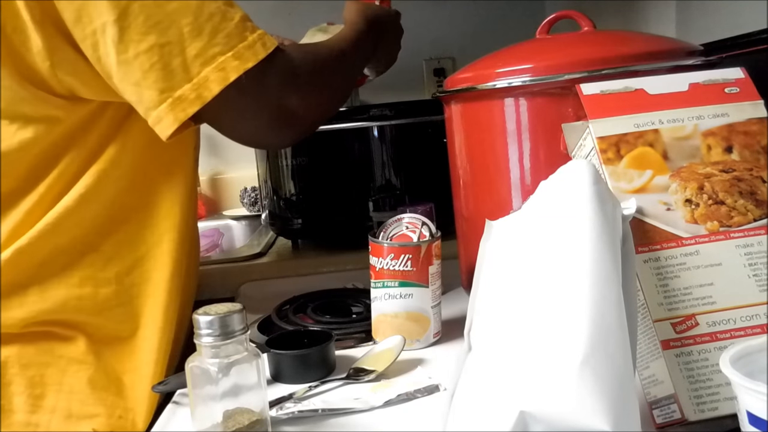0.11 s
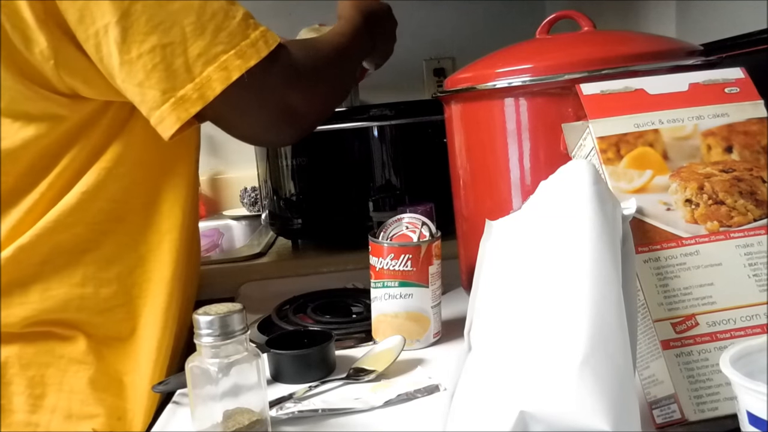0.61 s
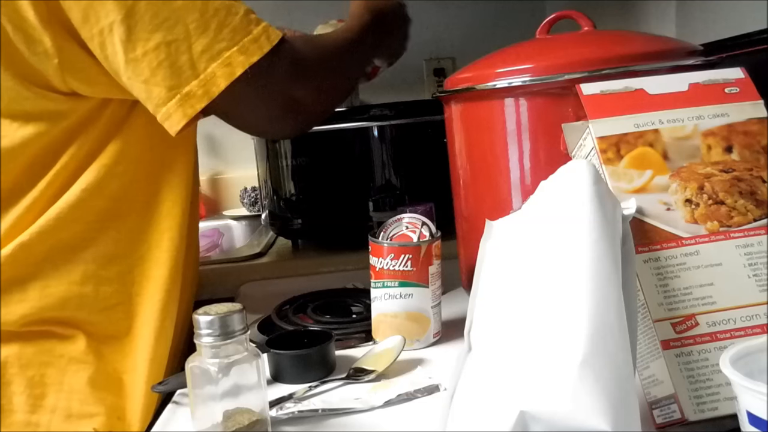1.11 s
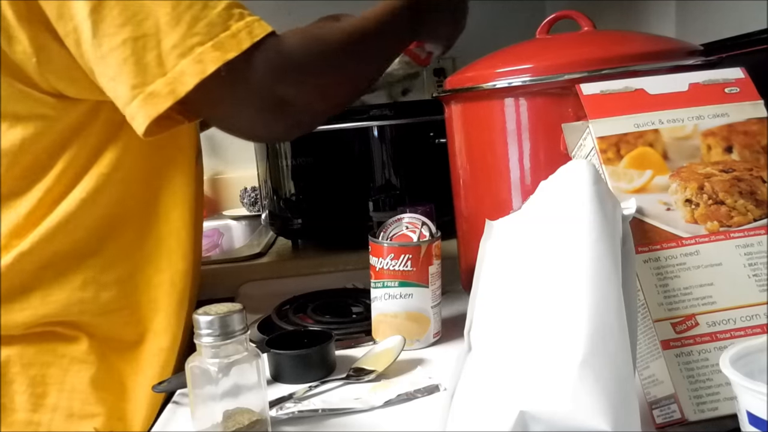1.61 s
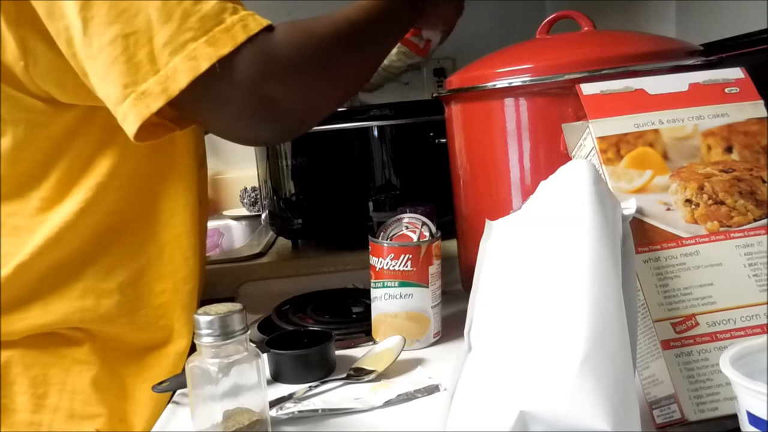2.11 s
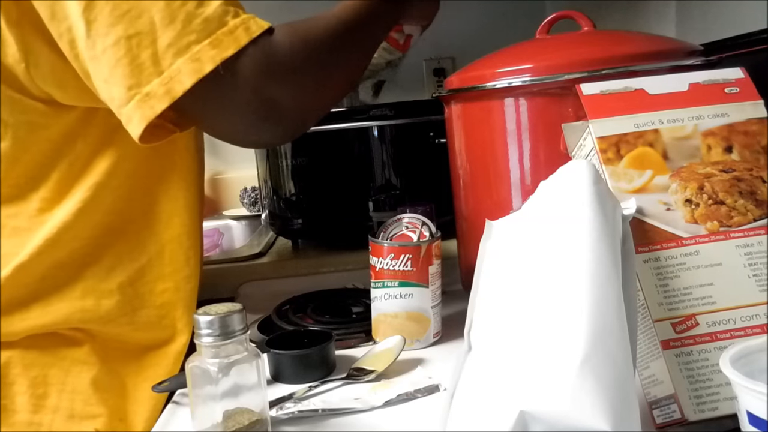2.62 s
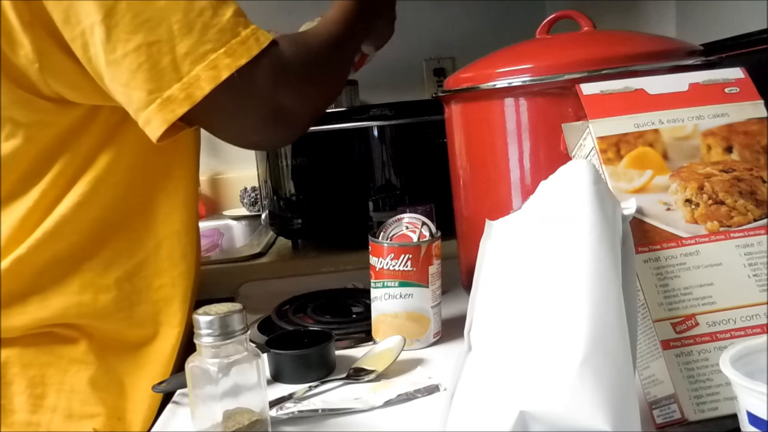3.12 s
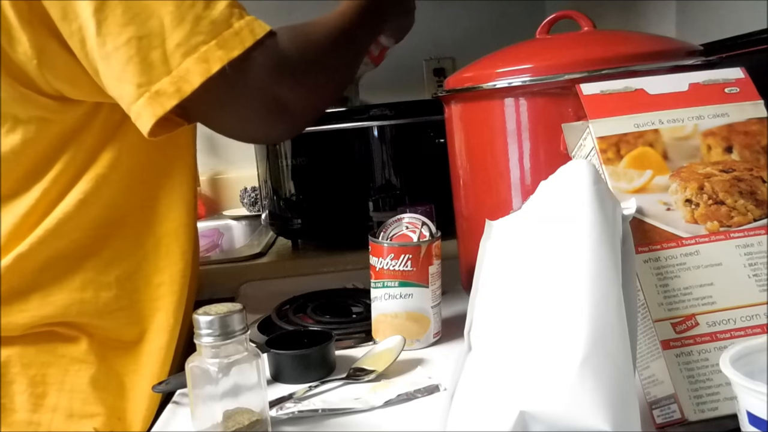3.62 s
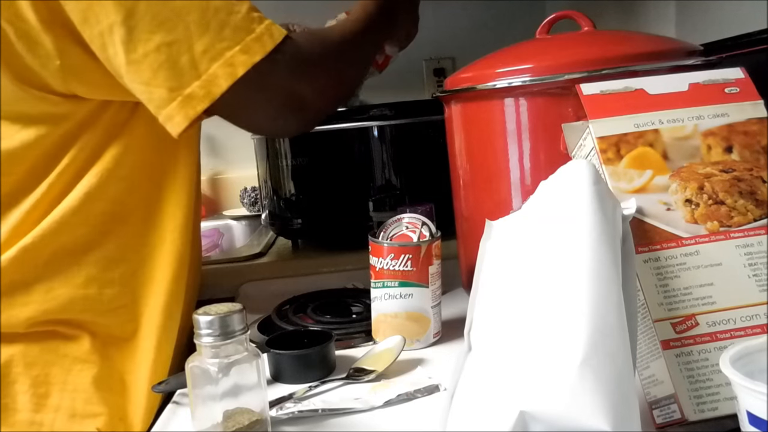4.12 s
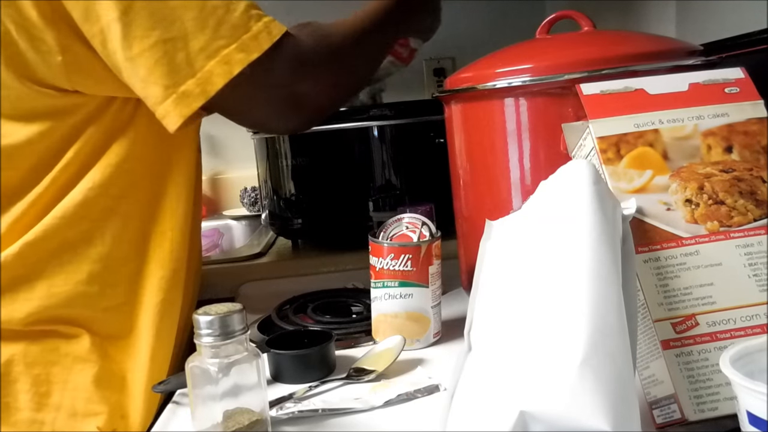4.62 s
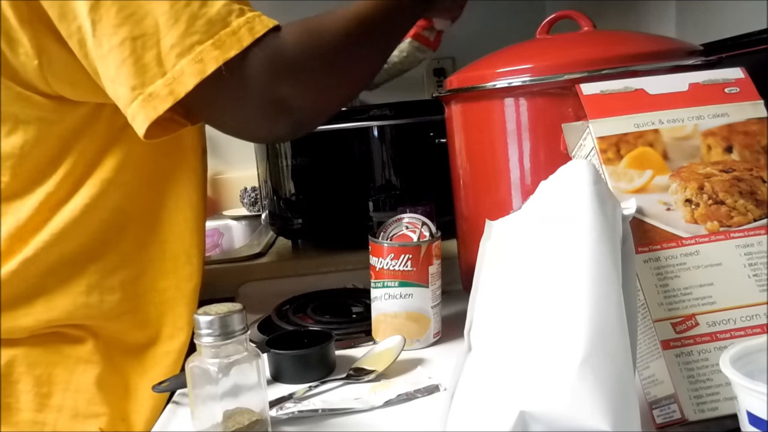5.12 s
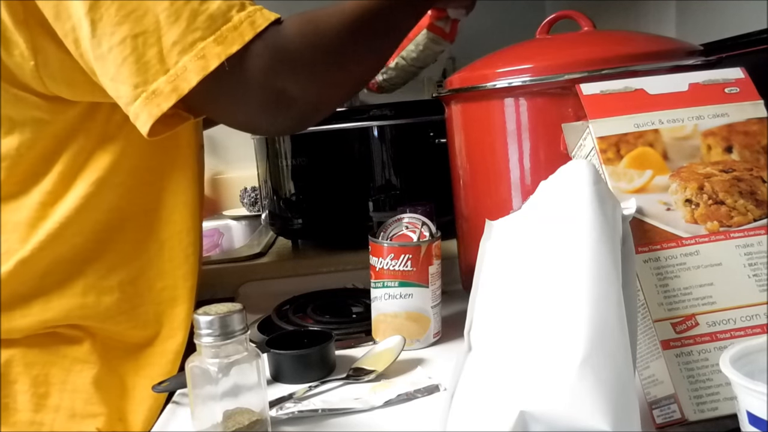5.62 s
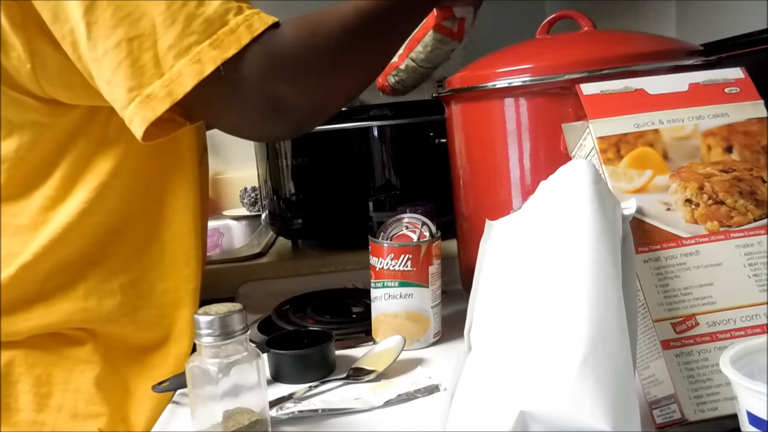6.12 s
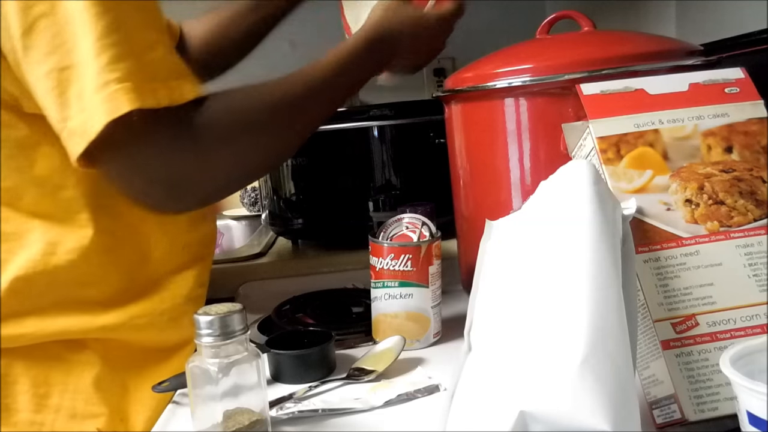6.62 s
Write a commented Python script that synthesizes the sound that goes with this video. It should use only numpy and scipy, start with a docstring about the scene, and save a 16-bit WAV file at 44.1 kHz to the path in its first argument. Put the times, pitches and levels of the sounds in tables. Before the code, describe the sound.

Frozen vegetables are shaken out of a crinkly bag into a hollow pot. Crisp, bright, irregular snaps dominate, with softer bean rattle and knocks underneath and occasional hard ceramic ticks. After an initial snap and brief lull it gets dense for several seconds, then sparse, almost silent, then a last few snaps. Steady quiet motor hum, short hard kitchen echo, close wide stereo pickup.

```python
"""Frozen beans are shaken from a stiff plastic bag into a stoneware pot, an arm's length from a small stereo camera.
An appliance hums throughout. A first snap leads to a short lull, then the shaking builds to a thick crackle:
noise bursts and clicks for the creases, struck resonances for beans in the hollow pot, decaying sines for its rim.
The crackle thins out after some five seconds, all but stops, and a last cluster of snaps ends the scene.
A small hard kitchen, made of decaying noise, echoes it all briefly."""
import sys
import numpy as np
from scipy import signal
from scipy.fft import rfft, irfft
from scipy.io import wavfile
from scipy.ndimage import uniform_filter1d

SR = 44100
rng = np.random.default_rng(int(sys.argv[2]) if len(sys.argv) > 2 else 0)


def log_audio(samples):
    """Write samples as a 16-bit WAV file to the path given in sys.argv[1]."""
    # one column per channel
    frames = np.atleast_2d(samples).T
    # limit to full scale, then quantise
    limited = np.clip(frames, -1, 1)
    pcm = np.round(limited * 32767).astype(np.int16)
    wavfile.write(sys.argv[1], SR, pcm)


def gain_from_decibels(decibels):
    """Convert decibel values to linear amplitude factors."""
    exponent = np.asarray(decibels, float) / 20
    return 10 ** exponent


N = 297675

# Dense rustle under the single events; the lesser snaps and knocks follow its levels too.
# Each row: time in seconds, level of the bag film in dB, level of the tumbling beans in dB.
RUSTLE_LEVELS = [(0.0, -33.5, -35), (0.25, -46.5, -51), (0.55, -39, -41.5), (0.72, -33.5, -41),
                 (0.76, -33, -33.5), (0.89, -23.5, -33), (1.08, -38.5, -38), (1.41, -26.5, -35.5),
                 (1.65, -27.5, -36), (1.87, -39, -40), (1.96, -31, -38), (2.03, -37, -38.5),
                 (2.2, -28, -36), (2.89, -29, -37.5), (3.12, -37.5, -40), (3.36, -29.5, -34.5),
                 (3.6, -31.5, -39.5), (3.97, -40.5, -40.5), (4.1, -36.5, -40), (4.45, -27.5, -41),
                 (4.7, -41.5, -45), (5.02, -47, -44.5), (6.0, -43, -42), (6.24, -54, -59),
                 (6.58, -53.5, -45), (6.75, -36, -33.5)]


def snaps():
    """Creases crumple in the film; each has its own length, colour and balance of crisp and middle."""
    # The loud creases. Each row: start in seconds, relative level of the crisp part in dB,
    # middle part re crisp in dB, decay time constant of the crisp part in ms, brightest pitch in Hz.
    loud_creases = [(0.0851, -6, -9.5, 6.6, 8900), (0.154, -14.5, -31, 7.7, 10100),
                    (0.6723, -13, -35, 4.3, 11300), (0.726, -17.5, -15, 17, 6300),
                    (0.7648, -16, -3.5, 16, 5700), (0.8023, -7.5, -27, 9.1, 4700),
                    (0.84, -13.5, -7.5, 12, 4670), (0.859, -9.5, -9, 7.9, 4820),
                    (0.894, -12.5, -15, 6, 7500), (0.9136, -11.5, -6, 21, 5330),
                    (0.9849, -7, -12.5, 8.3, 4650), (1.0115, -16.5, 0, 8.3, 7540),
                    (1.134, -21, -11, 8.2, 5580), (1.2015, -20, -4.5, 13, 5300),
                    (1.251, -14.5, -5, 15, 8410), (1.307, -12, -8, 6, 8520), (1.3235, -8, -7.5, 15, 10500),
                    (1.4083, -11, -5, 6.4, 9650), (1.422, -3.5, -13, 3.8, 11500),
                    (1.484, -19, -2, 13, 4960), (1.564, -9.5, -10, 24, 6200), (1.673, -11, -11, 4.1, 6800),
                    (1.7337, -6.5, -12.5, 6.8, 5300), (1.7962, -14.5, -6, 11, 10200),
                    (1.8202, -15.5, -12, 19, 8950), (1.8923, -10, -9.5, 8.2, 10100),
                    (2.0382, -6, -13, 7.5, 5940), (2.0847, -14, -7.5, 10, 4610), (2.16, -8, -8, 3.3, 8500),
                    (2.1861, -14.5, -0.5, 8.3, 6200), (2.2502, -13.5, -4.5, 6.9, 4670),
                    (2.2634, -8.5, -8.5, 9.8, 9300), (2.3243, -12, -3, 8.8, 10200),
                    (2.35, -13.5, -4, 13, 8960), (2.4092, -11, -8.5, 17, 8890),
                    (2.4432, -10.5, -9, 12, 10500), (2.5636, -9.5, -11, 9.7, 5450),
                    (2.5876, -11.5, -16, 17, 8110), (2.6148, -10.5, -4, 6.1, 10000),
                    (2.6466, -12, -10, 15, 10100), (2.6816, -10, -8.5, 24, 10000),
                    (2.757, -14, -5, 22, 5000), (2.8542, -5.5, -7, 4.4, 9970), (2.8817, -15, -8, 7, 7000),
                    (2.9868, -16.5, -13, 16, 8500), (3.0077, -4.5, -10.5, 9.7, 9400),
                    (3.033, -11.5, -6.5, 13.4, 7900), (3.0792, -10, -9.5, 20, 7670),
                    (3.1457, -14, -11, 7.2, 4870), (3.197, -11, -12.5, 8.1, 5570),
                    (3.2215, -16, -15, 8.6, 9190), (3.2806, -14, -7.5, 23, 6850),
                    (3.3504, -10.5, -5, 7.7, 8830), (3.3645, -8.5, -5, 3.8, 9490),
                    (3.4169, -17, -5.5, 38, 8300), (3.5197, -13.5, -2.5, 5.5, 8790),
                    (3.5788, -13, -19, 8.8, 7200), (3.6146, -11.5, -27, 5.8, 9200),
                    (3.678, -18, -9.5, 21, 10300), (3.766, -11, -13, 7.4, 6940),
                    (3.8319, -21, 2, 9.4, 4840), (3.8845, -14.5, -16, 11, 10200),
                    (3.915, -15.5, -2.5, 4.8, 5920), (3.991, -18, -10, 6.9, 9170),
                    (4.0132, -16, -3.5, 5.2, 8330), (4.0355, 0.5, -16, 6, 4600),
                    (4.114, -18.5, -5, 8.2, 10400), (4.2295, -18.5, -7.5, 5.4, 4600),
                    (4.3942, -15.5, -18, 20, 5580), (4.5164, -2, -31, 5, 10000),
                    (4.5479, -11.5, -11, 17, 4810), (4.583, -7.5, -16, 8.2, 4830),
                    (4.638, -12.5, -29, 7.5, 6310), (4.675, -14.5, -31, 12.6, 7700),
                    (4.7947, -26.5, -10, 8.6, 7700), (4.8687, -21.5, -1.5, 12, 6940),
                    (4.9461, -11.5, -1, 4.9, 9800), (5.0669, -18.5, -5.5, 4.5, 4820),
                    (5.1922, -28, -2, 5.7, 7350), (5.2985, -9.5, -7.5, 6.5, 9700),
                    (5.3644, -22.5, 0.5, 10, 8910), (5.441, -17.5, -6, 5, 7360), (5.506, -19, -9, 13, 6900),
                    (5.5483, -13, -16, 8.1, 11100), (5.5983, -17, -4, 9.5, 8660),
                    (5.662, -20, -6, 13, 4520), (5.7624, -25, -13, 10, 5540),
                    (5.8193, -18.5, -11, 11, 5760), (5.8395, -12.5, -15.5, 11.5, 11100),
                    (5.902, -25, -2, 10.5, 8200), (5.985, -12.5, -10, 6.9, 6240),
                    (6.0012, -12.5, -11, 7.6, 8500), (6.13, -23, -11, 9.1, 8850),
                    (6.566, -28.5, -1, 17, 12300), (6.6343, -13, -13, 4.8, 11000),
                    (6.6747, -28, 0.5, 7.1, 8320), (6.6928, -10.5, -6.5, 14, 9000)]
    small_middle_db, small_ms = -6.5, 9.2
    low_hz, high_hz = 4600, 10500
    # lesser creases come at random, as strong as the rustle of the film is
    s, db, size = at_random(count=30, column=1, re_db=12)
    small_hz = low_hz * (high_hz / low_hz) ** size
    small = [s, db, np.full(len(s), small_middle_db), np.full(len(s), small_ms), small_hz]
    s, db, middle_db, ms, hz = np.hstack([np.transpose(loud_creases), small])
    crisp = bursts(s + 0.0006, db, ms / 1000, rise_s=0.00038, grain_db=2.5, pitch_hz=hz)
    middle = bursts(s + 0.0008, db + middle_db, 1.66 * ms / 1000, rise_s=0.002, grain_db=2.5)
    return gain_from_decibels(-12) * band(crisp, 4600, 12300) + gain_from_decibels(-4.5) * band(middle, 1440, 5120)


def cracks():
    """The sharp wide click that opens some snaps, with two weaker bounces off the counter just after."""
    # Each row: start in seconds, relative level in dB.
    sharp_starts = [(0.7451, -8), (1.307, -5.5), (1.425, -7), (1.735, -7), (2.086, -11), (2.6831, -4),
                    (2.8552, -5), (3.01, -8), (3.1981, -15), (4.0365, -0.5), (4.871, -18), (4.948, -21),
                    (5.441, -18), (5.5058, -14), (5.585, -7), (5.8212, -13), (6.001, -20), (6.5685, -15),
                    (6.637, -6.5), (6.677, -13), (6.695, -2)]
    s, db = np.transpose(sharp_starts)
    sign = rng.choice([-1, 1], (len(s), 2))
    middle_and_side = np.array([[1.1], [0.8]])
    out = np.zeros((2, N))
    for delay_s, click_db in [(0, 4.5), (0.0006, -4.5), (0.0017, 1)]:
        at = ((s + delay_s) * SR).astype(int)
        out[:, at] += gain_from_decibels(db + click_db) * sign.T * middle_and_side
    return band(out, 1300, 13400)


def rustle():
    """Countless small creases in the film, and beans tumbling over each other and into the pot."""
    # Colour of the bag's crackle. Each row: frequency in Hz, relative density in dB per Hz.
    film_colour = [(1470, -16.5), (2500, 1), (3370, 0), (10300, 2), (15100, -8.5), (16100, -24),
                   (16500, -15)]
    # Colour of bean on bean. Each row: frequency in Hz, relative density in dB per Hz.
    bean_colour = [(500, -27), (850, -11.5), (979, 4), (1440, -6), (2020, -10), (3380, -8.5), (5000, -9),
                   (6500, -19), (11000, -120)]
    s, film_db, beans_db = np.transpose(RUSTLE_LEVELS)
    t = np.arange(N) / SR
    film = unit(colour(grains(per_s=660, scatter_db=2.5, smear_s=0.01), film_colour))
    tumble = grains(per_s=250, scatter_db=2.0, smear_s=0.02)
    beans = unit(colour(tumble, bean_colour)) + gain_from_decibels(-5) * unit(hollow(tumble))
    # the heap shifting as a whole is a duller, smoother murmur
    heap = gain_from_decibels(-8.5) * unit(band(grains(per_s=1300, scatter_db=3.5, smear_s=0.01), 273, 770))
    film_level = gain_from_decibels(np.interp(t, s, film_db))
    beans_level = gain_from_decibels(np.interp(t, s, beans_db))
    return film * film_level + (beans + heap) * beans_level


def knocks():
    """Beans land and ring the hollow of the pot."""
    # The loud landings. Each row: start in seconds, relative level in dB.
    landings = [(0.074, -23), (0.592, -29.5), (0.635, -29), (0.74, -31), (0.852, -25.5), (0.91, -23.5),
                (0.932, -29), (0.981, -28.5), (1.199, -25), (1.522, -27), (1.564, -27), (1.734, -25),
                (1.797, -25), (1.893, -27.5), (1.975, -26), (2.043, -22.5), (2.195, -24), (2.253, -24.5),
                (2.346, -24.5), (2.427, -27.5), (2.611, -23), (2.696, -22.5), (2.746, -32), (3.025, -26),
                (3.281, -28), (3.703, -30.5), (3.848, -24.5), (4.038, -26), (4.869, -23.5), (4.923, -25.5),
                (5.284, -30), (5.3, -19.5), (5.356, -30), (5.37, -26), (5.507, -29), (5.587, -29),
                (5.599, -24), (5.661, -27), (5.674, -29), (5.764, -25), (5.903, -21.5), (5.967, -30.5),
                (6.59, -28), (6.673, -33)]
    # lesser beans land at random, as strong as the tumbling is
    small = at_random(count=30, column=2, re_db=7)[:2]
    s, db = np.hstack([np.transpose(landings), small])
    return gain_from_decibels(28.5) * hollow(strikes(s, db, chatter_db=-19, chatter_s=0.0064))


def hollow(x):
    """The air in the pot rings at a few broad resonances and hardly at all below the lowest."""
    # Each row: resonance in Hz, width in Hz, relative level in dB.
    air_modes = [(1015, 83, 0), (1086, 180, 4), (1262, 65, -3.5), (1570, 230, -10.5)]
    rings = 0
    for hz, width, db in air_modes:
        rings = rings + gain_from_decibels(db) * signal.lfilter(*signal.iirpeak(hz, hz / width, SR), x)
    return signal.sosfilt(signal.butter(5, 860, "high", fs=SR, output="sos"), rings)


def clinks():
    """Beans strike the stoneware rim and ring its modes as dying sines; each blow favours other modes."""
    # Beans chattering on the rim. Each row: start in seconds, relative level in dB,
    # middle modes re lowest in dB, top modes re lowest in dB.
    rim_blows = [(0.2508, -41.5, -5, -9), (3.8138, -35, -1, -20), (3.8314, -35, -2, -15),
                 (3.845, -47.5, 0, -20), (3.87, -46, -3, -20), (4.547, -32, -5, -2),
                 (4.574, -33.5, 0, -0.5), (4.5864, -38, 3, 2), (4.6144, -44, 0, -2), (4.8727, -44, 0, -10),
                 (4.9483, -38, -4, -18), (6.032, -40.5, -5, -10)]
    # Modes of the rim. Each row: frequency in Hz, relative level in dB, time to fall by 60 dB in seconds.
    rim_modes = [(2584, 13, 0.045), (3290, 13, 0.019), (3720, 11, 0.038), (4820, 16, 0.055),
                 (5770, 2, .025), (8430, 8.5, 0.03)]
    s, db, middle_db, top_db = np.transpose(rim_blows)
    t, out = np.arange(6000) / SR, 0
    for hz, mode_db, t60 in rim_modes:
        if hz < 3000:
            spot_db = 0
        elif hz < 4200:
            spot_db = middle_db
        else:
            spot_db = top_db
        ring = gain_from_decibels(mode_db - 60 * t / t60) * np.sin(2 * np.pi * hz * t)
        blows = strikes(s, db + spot_db, chatter_db=-14.5, chatter_s=0.012)
        out = out + signal.oaconvolve(blows, ring[None], axes=1)[:, :N]
    return gain_from_decibels(-5) * out


def strikes(times, db, chatter_db, chatter_s):
    """A clean contact within a chatter of the bean that swells and dies in a few ms."""
    out = bursts(times, db + chatter_db, np.full(len(times), chatter_s), rise_s=0.0013, grain_db=2.5)
    contact = ((times + 0.001) * SR).astype(int)
    out[:, contact] += gain_from_decibels(db) * rng.choice([-1, 1], (len(times), 2)).T
    return out


def bursts(times, db, length_s, rise_s, grain_db, pitch_hz=None):
    """Each blow: a quick run of uneven ticks that dies with the reflections from counter, pots and wall."""
    t = np.arange(4000) / SR
    out = np.zeros((2, N + len(t)))
    for k, (s, gain, fall) in enumerate(zip(times, gain_from_decibels(db), np.maximum(length_s, 0.001))):
        ticks = gain_from_decibels(grain_db * np.repeat(rng.standard_normal(100), 40))
        shape = (1 - np.exp(-t / rise_s)) * np.exp(-t / fall)
        blow = gain * shape * ticks * pair(len(t))
        if pitch_hz is not None:  # the size of the buckling patch sets its colour
            peak = signal.lfilter(*signal.iirpeak(pitch_hz[k], 2.5, SR), blow)
            blow = 1.09 * blow + 1.03 * peak
        start = int(s * SR)
        out[:, start:start + len(t)] += blow
    return out[:, :N]


def grains(per_s, scatter_db, smear_s):
    """Random ticks of very unequal size, in clusters, each smeared by close reflections."""
    k = 300  # samples over which the density holds
    cluster = np.repeat(rng.exponential(size=N // k + 1), k)[:N]
    chosen = rng.random(N) < cluster * per_s / SR
    ticks = chosen * gain_from_decibels(scatter_db * np.minimum(rng.exponential(size=N), 3.2))
    t = np.arange(2600) / SR
    power = signal.oaconvolve(ticks ** 2, np.exp(-2 * t / smear_s))[:N]
    return np.sqrt(np.abs(power)) * pair(N)


def at_random(count, column, re_db):
    """Chance moments, with levels scattered about one column of the rustle, and a spare draw 0-1 for each."""
    scatter_db = 4  # either way
    when, scatter, spare = rng.random((count, 3)).T
    s = when * (N / SR - 0.01)
    levels = np.array(RUSTLE_LEVELS)
    level_db = np.interp(s, levels[:, 0], levels[:, column])
    return s, level_db + re_db + scatter_db * (2 * scatter - 1), spare


def room(x, t60_s, treble_t60_s, wet_db):
    """A small hard kitchen: decaying noise as its echo, shorter in the treble, new as hands and bag move."""
    hop = 8192
    t = np.arange(2 * hop) / SR
    onset = 1 - np.exp(-t / 0.0022)
    padded = np.pad(x, ((0, 0), (hop, 2 * hop)))
    wet = np.zeros((2, N + 6 * hop))
    for i in range(0, N + hop, hop):
        noise = pair(len(t))
        dull = signal.sosfilt(signal.butter(1, 3000, fs=SR, output="sos"), noise)
        treble = noise - dull
        echo = (dull * gain_from_decibels(-60 * t / t60_s) + treble * gain_from_decibels(-60 * t / treble_t60_s)) * onset
        echo = echo / np.sqrt(np.sum(echo ** 2) / 2)
        # unrelated echoes overlap at constant power
        part = padded[:, i:i + 2 * hop] * np.sqrt(np.hanning(2 * hop))
        wet[:, i:i + 4 * hop - 1] += signal.fftconvolve(part, echo, axes=1)
    return x + gain_from_decibels(wet_db) * wet[:, hop:hop + N]


def appliance():
    """Three motor tones, wandering in phase, over the air of the room; its lows below 140 Hz drift at random."""
    # Motor tones. Each row: frequency in Hz, relative rms level in dB.
    motor_tones = [(212, -55.5), (240, -54), (265, -56.5)]
    # Colour of the air. Each row: frequency in Hz, relative density in dB per Hz.
    air_colour = [(25, -13.5), (60, -6.5), (130, -6.5), (220, 1), (330, -5.5), (700, -15), (2200, -17),
                  (4200, -5.5), (7000, -31), (12500, -22), (16000, -51)]
    t = np.arange(N) / SR
    waver = uniform_filter1d(rng.standard_normal((len(motor_tones), N)), 9000) * 20  # radians
    tones = 0
    for (hz, db), w in zip(motor_tones, waver):
        tones = tones + gain_from_decibels(db) * np.sqrt(2) * np.sin(2 * np.pi * hz * t + w)
    air = gain_from_decibels(-46) * unit(colour(pair(N), air_colour))
    lows = signal.sosfilt(signal.butter(2, 140, fs=SR, output="sos"), air)
    drift = uniform_filter1d(uniform_filter1d(rng.standard_normal(N), 4000), 4000)
    lows_gain = gain_from_decibels(4.75 * unit(drift))
    middle_and_side = np.array([[1], [0.15]])
    return tones * middle_and_side + air + (lows_gain - 1) * lows


def spread(x):
    """Middle and side to left and right, with likeness, balance and phase that vary over frequency."""
    # Each row: frequency in Hz, left-right likeness from 0 to 1.
    likeness = [(60, 0.85), (200, 0.86), (1000, 0.8), (2500, 0.33), (6000, 0.02), (14000, 0.64)]
    # Each row: frequency in Hz, left minus right in dB.
    balance = [(60, -2), (110, -0.5), (200, -0.5), (380, 0.5), (700, 1), (1290, 0.5), (2380, -1),
               (4400, -1.5), (8120, -2), (15000, 1)]
    # Each row: frequency in Hz, phase by which the left leads in radians.
    left_lead = [(0, -0.44), (1290, 0.25), (2670, -0.7), (10300, -1.14), (16400, -1.3)]
    hz = np.linspace(0, SR / 2, N // 2 + 1)
    alike = np.clip(along(likeness, hz), 0, 1)
    lean = along(balance, hz) / 2
    mid, side = rfft(x) * np.sqrt([(1 + alike) / 2, (1 - alike) / 2])
    left = (mid + side) * gain_from_decibels(lean) * np.exp(1j * along(left_lead, hz))
    right = (mid - side) * gain_from_decibels(-lean)
    return irfft(np.array([left, right]), N)


def along(table, hz):
    """A table read on a log-frequency axis."""
    f, v = np.transpose(table)
    return np.interp(np.log(hz + 1), np.log(f + 1), v)


def colour(x, table):
    """Causal filter with the table's spectrum, built from the cepstrum of its log gain."""
    log_gain = along(table, np.linspace(0, SR / 2, 513)) * np.log(10) / 20
    c = irfft(log_gain)
    c[1:512], c[513:] = 2 * c[1:512], 0  # folded forward in time: minimum phase
    response = irfft(np.exp(rfft(c)))
    return signal.oaconvolve(x, response[None], axes=1)[:, :N]


def band(x, lo_hz, hi_hz):
    """Band-pass with about unit power gain for white noise."""
    sos = signal.butter(2, [lo_hz, hi_hz], "band", fs=SR, output="sos")
    return signal.sosfilt(sos, x) / np.sqrt(2 * (hi_hz - lo_hz) / SR)


def pair(length):
    """Two noises, one for the middle and one for the side."""
    return rng.standard_normal((2, length))


def unit(x):
    """Scaled to rms 1."""
    return x / np.sqrt(np.mean(x ** 2))


def scene():
    """Bag, beans and pot in the kitchen; the rim faces the camera, so it stirs the room less."""
    rim = clinks()
    close = snaps() + cracks() + knocks() + rustle() + 0.5 * rim
    echoed = room(close, t60_s=0.49, treble_t60_s=0.34, wet_db=-5.0)
    return spread(echoed + 0.35 * rim + appliance())


def top_cut(x):
    """Nothing passes above the cut-off."""
    return signal.sosfilt(signal.butter(12, 16820, fs=SR, output="sos"), x)


def record(dry):
    """The loudest peaks are rounded and a steep low-pass ends the treble at 15750 Hz."""
    rounded = np.tanh(dry)
    low_passed = signal.sosfilt(signal.ellip(8, 0.2, 60, 15750, fs=SR, output="sos"), rounded)
    return top_cut(low_passed)


dry = scene()
out = record(dry)
log_audio(out)
```